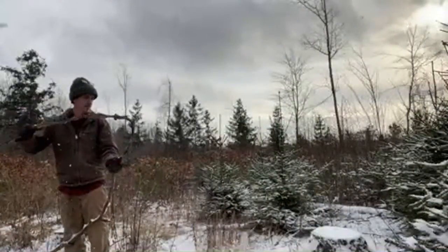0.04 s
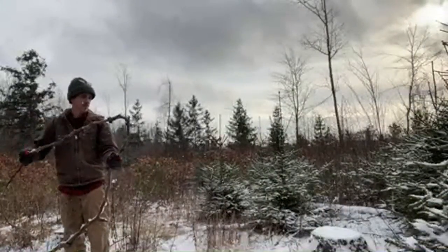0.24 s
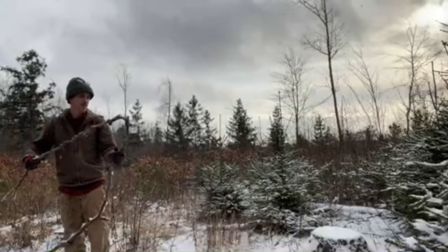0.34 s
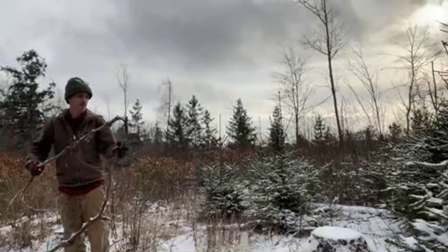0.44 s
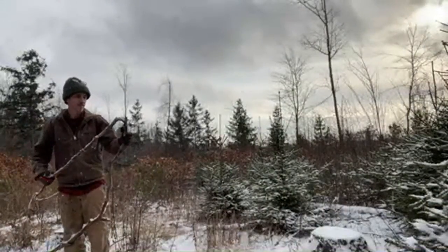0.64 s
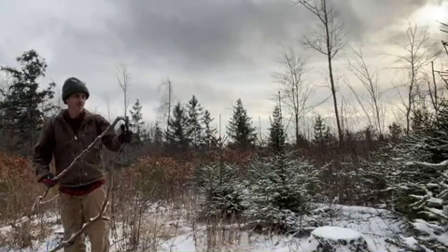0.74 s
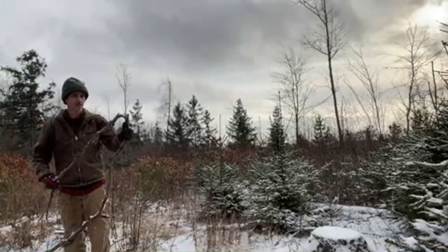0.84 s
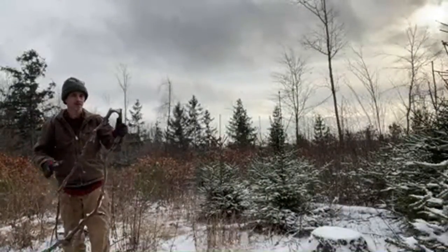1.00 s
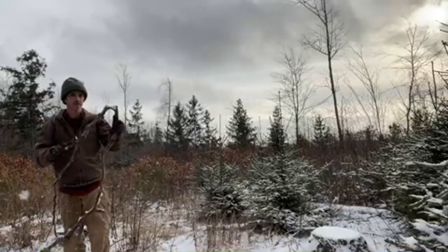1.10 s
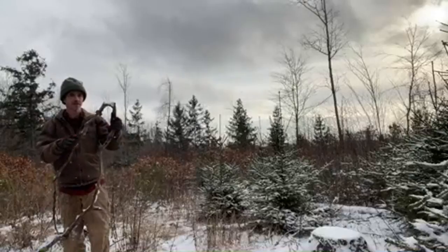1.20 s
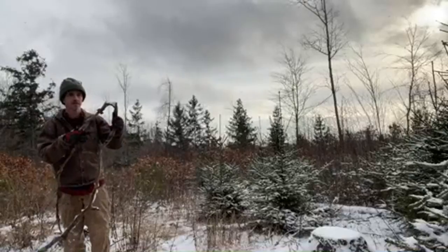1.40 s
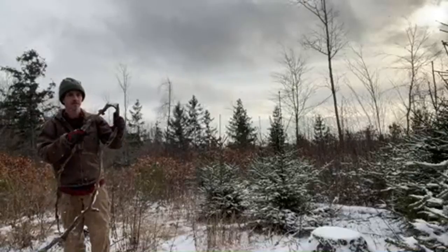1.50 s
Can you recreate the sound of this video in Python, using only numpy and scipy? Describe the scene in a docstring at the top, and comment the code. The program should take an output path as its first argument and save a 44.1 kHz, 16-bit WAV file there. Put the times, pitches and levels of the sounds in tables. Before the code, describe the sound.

A dry branch snaps by hand with one sharp, bright crack and a short echo off trees. Faint twig ticks, jacket swishes and a small snow crunch follow, heard from a few metres away in a quiet clearing.

```python
"""Snapping a branch in the snow

A dry branch is snapped by hand in a snowy clearing: fibres tear, the wood gives way with one sharp,
ringing break, splinters spray and a short echo comes off the trees. Twigs tick and knock as it is
gripped, while a jacket swishes, gloves and boots bump, snow crunches and the air rumbles faintly."""
import sys
import numpy as np
from scipy import signal
from scipy.fft import rfft, irfft
from scipy.io import wavfile

SR = 44100
rng = np.random.default_rng(int(sys.argv[2]) if len(sys.argv) > 2 else 0)


def log_audio(samples):
    """Write samples as a 16-bit WAV file to the path given in sys.argv[1]."""
    # one column per channel
    frames = np.atleast_2d(samples).T
    # limit to full scale, then quantise
    limited = np.clip(frames, -1, 1)
    pcm = np.round(limited * 32767).astype(np.int16)
    wavfile.write(sys.argv[1], SR, pcm)


N = 68355


def undb(db):
    """Decibels to gain."""
    return 10 ** (np.asarray(db) / 20)


def unit(x):
    """Scale to an rms of 1."""
    return x / np.sqrt(np.mean(x ** 2) + 1e-20)


def since(start):
    """Seconds since a moment, for every sample."""
    return (np.arange(N) - np.round(start * SR)) / SR


def cut(x, hz, kind, order=2):
    """Smooth low-pass or high-pass."""
    return signal.sosfilt(signal.butter(order, min(hz, .45 * SR), kind, fs=SR, output="sos"), x)


def colour(x, curve):
    """Shape a sound with an EQ curve of (Hz, dB) points; rms 1."""
    hz, db = np.array(curve, float).T
    bin_hz = np.maximum(np.arange(N + 1) * SR / (2 * N), 1)
    gain = undb(np.interp(np.log(bin_hz), np.log(hz), db))
    return unit(irfft(rfft(x, 2 * N) * gain)[:N])


def grains(per_s, spread_db):
    """Random tiny clicks of uneven size; rms 1."""
    hits = rng.random(N) < per_s / SR
    size = undb(spread_db * np.clip(rng.standard_normal(N), -2, 2))
    return unit(hits * rng.choice([-1, 1], N) * size)


def ring(start, hz, t60):
    """One struck mode, dying by 60 dB in t60 seconds."""
    t = np.maximum(since(start), 0)
    return np.sin(2 * np.pi * hz * t) * np.exp(-np.log(1000) * t / t60)


def envelope(start, length, db, attack, release):
    """A linear rise, held until `length` seconds after the start, then an exponential tail."""
    t = since(start)
    return undb(db) * np.clip(t / attack, 0, 1) * np.exp(-np.maximum(t - length, 0) / release)


def rustle(texture, curve, bursts):
    """Bursts of one grainy material, each with its own envelope and brightness."""
    out = np.zeros(N)
    for *shape, tilt in bursts:
        tilted = [(hz, db + tilt * np.log2(hz)) for hz, db in curve]
        out += colour(texture, tilted) * envelope(*shape)
    return out


# The rumble's swells and dips. Each row: time in seconds, level in dB.
RUMBLE_LEVELS = [(0, -66.5), (0.041, -56), (.08, -46.5), (.13, -67), (.23, -61), (.30, -60), (.39, -69.5),
                 (.46, -72.5), (.6, -77.5), (1.13, -78.5), (1.2, -71.5), (1.32, -71.5), (1.38, -71),
                 (1.44, -68), (1.49, -86)]
# The rumble's dark tone. Each row: frequency in Hz, relative level in dB.
RUMBLE_EQ = [(25, -17), (45, -28), (72, -5), (130, -4), (250, -13), (600, -24), (1500, -49.5), (5000, -77)]
# The hiss of still forest air. Each row: frequency in Hz, relative level in dB.
HISS_EQ = [(25, -19.5), (70, -4), (250, -1.5), (600, -2.5), (1100, -2.5), (2000, -4), (5000, -5.5),
           (15500, -7.5)]


def air():
    """Forest air: a faint steady hiss over an uneven low rumble."""
    swell = undb(np.interp(since(0), *np.array(RUMBLE_LEVELS).T))
    rumble = swell * colour(rng.standard_normal(N), RUMBLE_EQ)
    hiss = undb(-63.5) * colour(rng.standard_normal(N), HISS_EQ)
    return rumble + hiss


# The tone of the cloth. Each row: frequency in Hz, relative level in dB.
CLOTH_EQ = [(100, -9), (300, 4.5), (700, 1.5), (1300, 4), (2400, 3.5), (4300, 6), (7000, 0), (11000, 1),
            (15500, -6.5)]
# Sleeve swishes. Each row: start and length in seconds, level in dB, attack and release in seconds,
# brightness in dB per octave.
SLEEVE_SWISHES = [(-.02, 0.13, -56.5, 0.034, 0.025, -.5), (0.103, 0.064, -49, 0.057, 0.055, 0.5),
                  (0.483, 0.042, -66.5, 0.022, .02, 2.5), (0.66, 0.259, -60, 0.012, 0.021, 1.9),
                  (1.069, 0.077, -63, 0.014, 0.049, 1), (1.194, 0.082, -59.5, 0.026, 0.0094, 0),
                  (1.285, 0.093, -56.5, 0.043, 0.042, -0.9), (1.506, 0.021, -63, .02, 0.019, -.5)]


def jacket():
    """Cloth slides over cloth in a fine, dense grain."""
    return rustle(grains(per_s=20000, spread_db=3), CLOTH_EQ, SLEEVE_SWISHES)


# Twig ticks and knocks, plus a few sharp splinter cracks just after the break (near 0.265, 0.273 and 0.299 s).
# Each row: start in seconds, ring level in dB, pitch in Hz, t60 in seconds, # crack level in dB, crack low-pass
# in Hz.
TWIG_TICKS = [(0.019, -49, 1400, 0.0045, -49, 7000), (0.121, -34, 3650, 0.0057, -31, 13000),
              (.1695, -42.5, 4600, .008, -53, 12000), (0.2254, -43, 3440, 0.007, -30.5, 10200),
              (0.2547, -22, 6960, 0.0045, -25, 11000), (0.2579, -21, 4440, 0.0024, -19, 10900),
              (0.2648, -35, 4060, 0.0039, -34, 10000), (.2727, -28, 6170, 0.0043, -35, 15000),
              (0.2988, -38, 5040, .003, -39, 13900), (0.432, -25, 2940, 0.0015, -24.5, 15300),
              (0.457, -37, 1608, 0.0028, -35.5, 8140), (.4995, -52, 4970, 0.0037, -51, 12000),
              (0.6287, -48, 1700, 0.0077, -41, 9970), (.632, -48, 910, 0.015, -45, 7000),
              (.638, -48.5, 1300, 0.0046, -52, 4900), (.6635, -47, 1780, 0.0043, -44, 5000),
              (0.8543, -45, 3530, 0.0027, -42, 10000), (0.94, -42, 1750, 0.0067, -35, 14000),
              (.964, -41, 4830, .003, -39, 14000), (.970, -38.5, 4870, .004, -44, 12000),
              (0.9777, -49, 4530, 0.0026, -41, 12000), (.986, -56, 4750, .004, -43, 10000),
              (.999, -50, 1980, .003, -41, 14000), (1.006, -42.5, 1930, .007, -51, 6000),
              (1.011, -43, 13000, .0012, -50, 15000), (1.130, -50.5, 3730, 0.013, -51, 9000),
              (1.1419, -50, 2770, 0.0031, -40, 8000), (1.164, -39, 1480, 0.0039, -40, 3500),
              (1.297, -48.5, 1080, 0.016, -39.5, 14900), (1.3573, -38.5, 3800, 0.0055, -36, 10000),
              (1.3604, -36.5, 3570, 0.0047, -30, 9000), (1.3989, -33.5, 1200, 0.0062, -33, 4000),
              (1.422, -40, 2250, 0.0026, -39.5, 7000), (1.4945, -48, 1364, 0.0081, -45, 7040)]


def twigs():
    """Each twig tick, and each splinter crack after the break, gives a sharp crack and a brief ring, scattered
    by the brush close by."""
    ticks = np.zeros(N)
    grit = rng.choice([-1., 1.], N)
    for start, ring_db, hz, t60, crack_db, top_hz in TWIG_TICKS:
        crack = grit * envelope(start, length=0, db=crack_db, attack=1 / SR, release=0.00028)
        ticks += undb(ring_db) * ring(start, hz, t60) + cut(crack, top_hz, "low")
    ticks = cut(ticks, 1330, "high", order=3)  # twigs radiate little bass
    brush = grains(per_s=10000, spread_db=0.5)
    brush *= envelope(start=0.00036, length=0.0018, db=0, attack=0.0006, release=0.0027)
    scattered = signal.fftconvolve(ticks, unit(brush) / np.sqrt(N))[:N]  # response of unit energy
    return ticks + undb(-3.5) * scattered


# Dull handling thuds. Each row: start in seconds, level in dB, pitch in Hz, t60 in seconds.
THUDS = [(0.022, -44.5, 301, 0.033), (.064, -40, 690, 0.0095), (0.069, -46, 310, .05),
         (.080, -57, 172, 0.044), (0.209, -50.5, 90, 0.27), (0.336, -47, 184, 0.049),
         (0.384, -49.5, 75, 0.1), (0.846, -64, 84, 0.14), (.985, -59, 368, 0.079),
         (1.1654, -39.5, 523, 0.0079), (1.175, -55, 158, 0.1), (1.341, -59, 246, 0.085),
         (1.365, -53.5, 79.6, 0.089), (1.415, -58.5, 84, 0.18)]


def gloves_and_boots():
    """Each soft bump of a glove or boot sounds one damped mode."""
    return sum(undb(db) * ring(start, hz, t60) for start, db, hz, t60 in THUDS)


# The tone of the snow. Each row: frequency in Hz, relative level in dB.
SNOW_EQ = [(100, -12), (400, -9.5), (1100, 1.5), (2000, -2.5), (3000, -1), (4800, 1.5), (9000, 0),
           (15500, -1)]
# Snow crunches. Each row: start and length in seconds, level in dB, attack and release in seconds,
# brightness in dB per octave.
SNOW_CRUNCHES = [(0.117, 0.0075, -45, 0.0025, 0.0066, -1), (0.628, 0.0077, -53, 0.0025, 0.013, -2.2),
                 (0.924, 0.02, -43.5, 0.014, 0.013, 2.5), (0.946, 0.041, -50.5, 0.013, 0.0092, 0.1),
                 (0.977, 0.052, -57, 0.011, 0.019, -1)]


def snow():
    """Crystals crush in short, gritty bursts."""
    return rustle(grains(per_s=8000, spread_db=9), SNOW_EQ, SNOW_CRUNCHES)


BREAK_S = 0.2405
# The ring of the breaking wood. Each row: pitch in Hz, level in dB, t60 in seconds.
WOOD_MODES = [(556, -25.5, 0.014), (865, -41.5, .007), (1870, -36.5, .012), (3146, -4.5, 0.0068),
              (3400, -22, 0.006), (4120, -19.5, .0035), (7000, -12.5, 0.0022), (8600, -15, 0.0082),
              (11080, -22, 0.0014)]
# The bright rasp of tearing fibres. Each row: frequency in Hz, relative level in dB.
FIBRE_EQ = [(150, -30), (500, -9), (1100, -16), (2300, -9.5), (3200, 0), (4400, 3), (5300, -10), (6700, 4),
            (7900, -5), (9000, 2), (11000, -9.5), (15500, -9.5)]


def branch_snap(give_s=0.00019, tear_rise_s=0.0015, tear_fall_s=0.0022):
    """Fibres tear, the wood gives way and rings, and splinters crackle after it."""
    t = since(BREAK_S)
    give = 1 - np.exp(-np.maximum(t, 0) / give_s)
    wood = give * sum(undb(db) * ring(BREAK_S, hz, t60) for hz, db, t60 in WOOD_MODES)
    tear_peak = undb(-14) * np.exp(np.minimum(t / tear_rise_s, -t / tear_fall_s))
    tear = tear_peak * colour(grains(per_s=16000, spread_db=4.5), FIBRE_EQ)
    spray = envelope(BREAK_S, length=0.016, db=-30.5, attack=0.0042, release=0.0065)
    splinters = spray * colour(grains(per_s=3500, spread_db=3), FIBRE_EQ)
    return cut(wood + tear + splinters, 380, "high", order=3)  # thin wood radiates little bass


# The tone of the echo off the trees. Each row: frequency in Hz, relative level in dB.
ECHO_EQ = [(100, -3), (600, -6.5), (1200, -6), (1900, 0.5), (3100, 1.5), (4800, 2), (6500, -1), (8800, -1),
           (12000, -4), (15500, -7.5)]


def tree_echo(onset_s=0.03, t60=0.36):
    """A short, grainy wash follows the break, as its echo from many trunks."""
    wash = colour(grains(per_s=7000, spread_db=4), ECHO_EQ)
    return wash * envelope(BREAK_S, length=onset_s, db=-42.5, attack=onset_s, release=t60 / np.log(1000))


def scene():
    """Wood, its echo, handling and air, heard in mono from a few metres away."""
    wood = branch_snap() + twigs()
    return (wood + tree_echo() + gloves_and_boots() + jacket() + snow() + air())[None]


def record(dry, low_hz=55.4, top_hz=15900):
    """Roll off the deep bass and cut the very top steeply."""
    top_cut = signal.ellip(10, .2, 75, top_hz, fs=SR, output="sos")
    return signal.sosfilt(top_cut, cut(dry, low_hz, "high", order=5))


dry = scene()
out = record(dry)
log_audio(out)
```